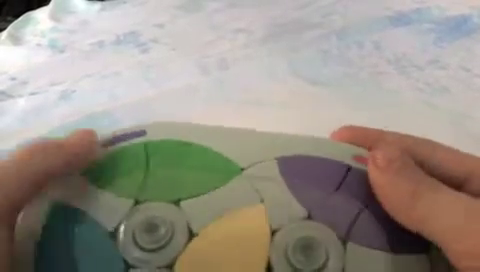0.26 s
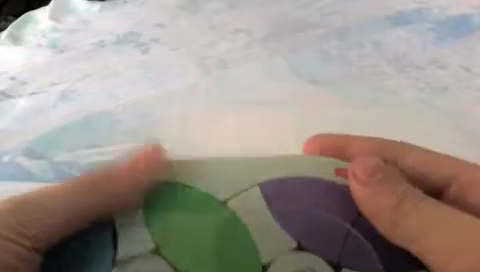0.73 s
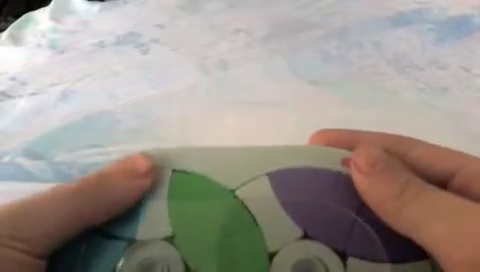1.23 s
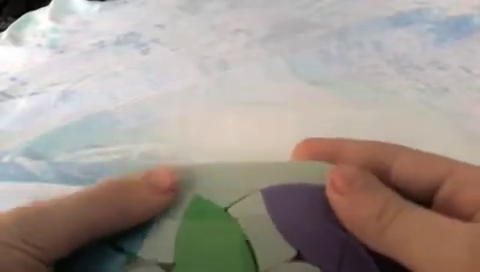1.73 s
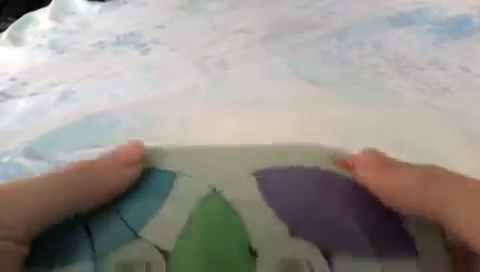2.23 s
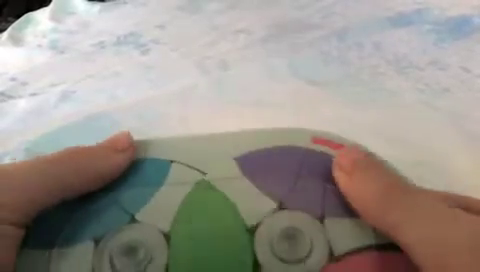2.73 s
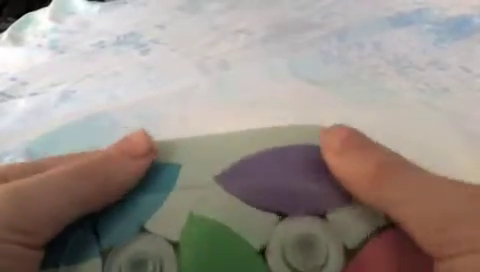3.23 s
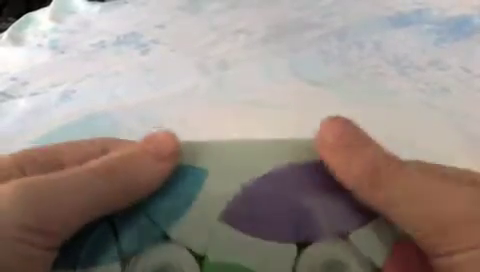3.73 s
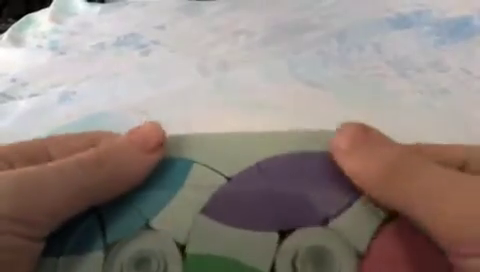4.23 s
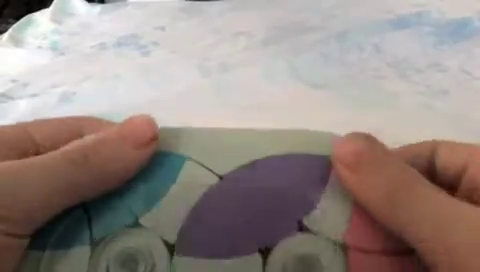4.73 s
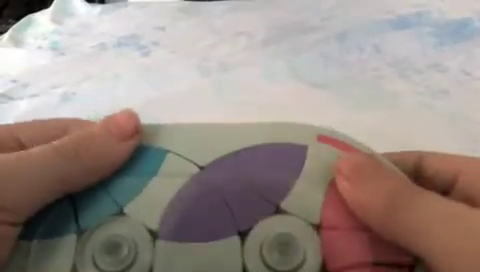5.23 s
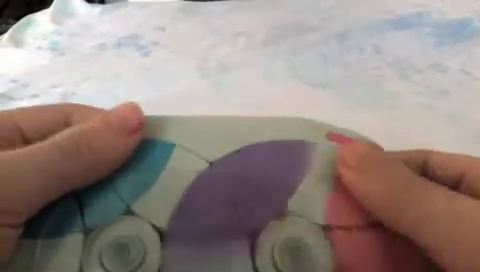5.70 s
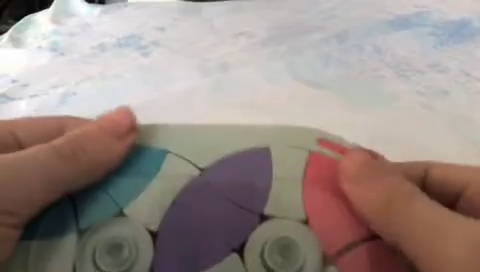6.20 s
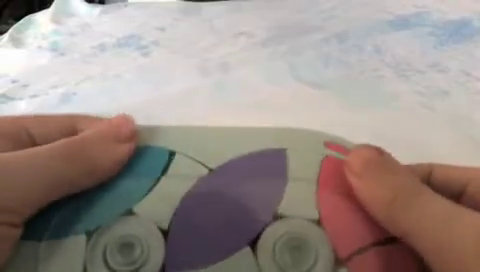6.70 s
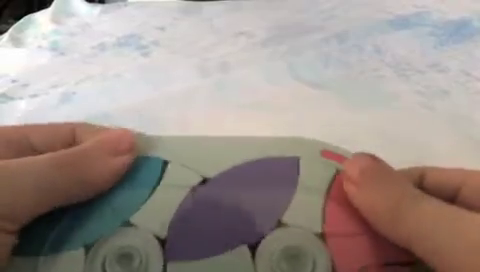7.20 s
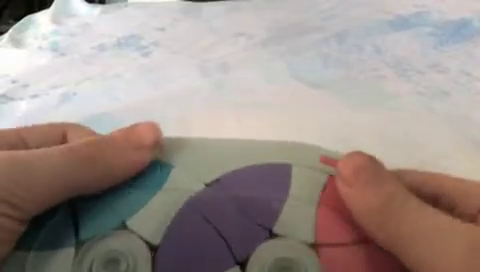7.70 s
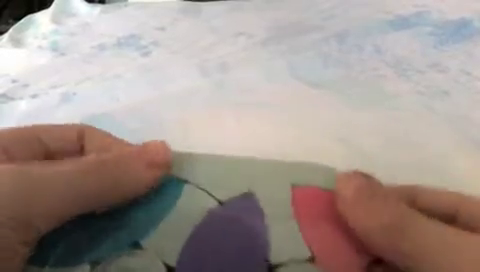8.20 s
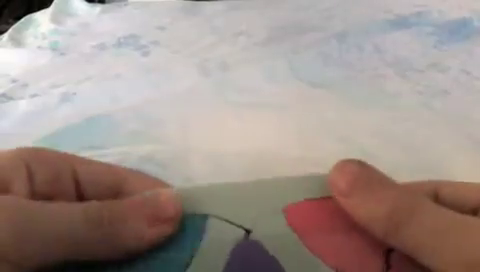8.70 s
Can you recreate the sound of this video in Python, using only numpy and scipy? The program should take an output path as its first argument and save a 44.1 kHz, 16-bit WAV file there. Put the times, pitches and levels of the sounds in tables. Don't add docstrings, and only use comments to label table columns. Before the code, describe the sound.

Hard plastic pieces of a handheld turning puzzle click, clack and scrape in uneven bursts, close up, with a few piercing tiny squeaks in a quiet room.

```python
import sys
import numpy as np
from scipy import signal
from scipy.fft import rfft, irfft, next_fast_len
from scipy.io import wavfile
from scipy.ndimage import uniform_filter1d, map_coordinates

SR = 44100
rng = np.random.default_rng(int(sys.argv[2]) if len(sys.argv) > 2 else 0)


def dump_mix(stems):
    frames = np.atleast_2d(stems).T
    limited = np.clip(frames, -1, 1)
    pcm = np.round(limited * 32767).astype(np.int16)
    wavfile.write(sys.argv[1], SR, pcm)


def nominal_scale(level):
    x = np.asarray(level, float) / 20
    return 10 ** x


N = 394681

# start_s, clack_db
TAPS = [(1.144, -43.5), (5.384, -41), (6.06, -52), (3.156, -32), (4.124, -36), (4.157, -33), (4.247, -40),
        (5.7887, -28), (6.717, -30), (6.789, -27), (6.7945, -38), (7.138, -42), (7.7555, -42), (7.86, -32),
        (8.468, -44), (0.572, -41), (0.726, -40), (.748, -40), (0.79, -38.5), (1.8077, -47), (2.497, -41.5),
        (3.2902, -40), (3.7722, -51), (3.8304, -38), (4.4226, -37), (4.6856, -32), (4.6944, -43),
        (5.0333, -42.5), (8.4988, -41), (1.4822, -42), (7.845, -44), (5.19, -38), (3.3945, -39),
        (4.102, -29.5), (4.009, -39.5), (7.3925, -47), (7.5126, -41.5), (7.915, -35.5), (8.0048, -54),
        (8.067, -32), (8.2676, -31), (8.279, -32), (.5, -34), (.5615, -46), (0.674, -34), (0.7137, -37),
        (.83, -56), (1.837, -41), (1.933, -41), (2.839, -54), (2.917, -36), (4.648, -53), (4.629, -59),
        (8.191, -57), (8.203, -31.5), (8.256, -32), (8.46, -40.5), (8.625, -48.5)]
# centre_s, peak_db, pitch_hz, width_ms
SQUEAKS = [(1.608, -7.5, 12650, 4.9), (1.6202, -22.5, 8580, 10), (1.6685, -9.5, 8980, 7.1),
           (1.6635, -25, 9300, 14), (1.6795, -11.5, 8950, 8.6), (1.6865, -13, 8960, 5.1),
           (1.877, -36.5, 9100, 6.2), (1.893, -38, 9270, 8.1), (1.857, -13.5, 8990, 5.8),
           (1.862, -14, 9160, 3.5), (1.866, -21, 9600, 3.5), (1.846, -35, 8880, 8), (2.95, -23, 9060, 3.7),
           (4.97, -22, 8920, 3.1), (1.105, -29.5, 8970, 4), (4.956, -29, 8800, 2), (6.5444, -4, 9690, 4.9),
           (6.7863, 0.5, 9820, 7.1), (6.8172, -30.5, 9730, 4), (7.0844, -8, 9710, 4.9),
           (7.3137, -4.5, 9890, 4.7), (7.3387, -3, 10050, 5.7)]
# start_s, peak_db, pitch_hz
THUDS = [(0.054, -37.5, 167.4), (1.694, -41.5, 164), (3.634, -44.5, 105), (3.744, -44.5, 169),
         (3.941, -56, 199), (3.962, -56, 148), (4.628, -52.5, 222), (4.666, -50, 162), (3.953, -49, 150),
         (5.498, -45.5, 143), (8.03, -32, 480)]
# start_s, end_s, level_db
BRUSHES = [(2.008, 2.04, -59), (2.25, 2.346, -64), (2.361, 2.384, -46.5), (2.41, 2.518, -56),
           (8.62, 8.637, -53.5), (0.937, 0.953, -55.5), (5.911, 5.93, -65)]
# centre_hz, width_hz, level_db
SHELL = [(544, 280, -8.5), (792, 540, -5), (1069, 470, 3), (1310, 440, -0.2)]
# centre_hz, width_hz, level_db
PIECES = [(2120, 1500, -9.5), (2942, 1470, 3.7), (3950, 1600, 1), (4740, 380, -7.5)]
# centre_hz, width_hz, level_db
EDGES = [(6410, 1200, 4), (8580, 1600, 6.5), (10470, 840, 7.5), (12500, 1700, -1.5), (14500, 1500, -15)]
# pitch_hz, level_db
HUSH = [(30, -36.5), (100, -0.5), (370, -4.5), (480, -11), (900, -1.5), (2070, -13), (2800, -15.5),
        (4500, -21.5), (7000, -26), (10000, -31), (13500, -42.5)]
# pitch_hz, t60_s
WALLS = [(300, 0.51), (1500, 0.24), (10000, 0.18), (13000, 0.14)]
# pitch_hz, level_db
WALL_COLOUR = [(400, -4), (1400, -2), (2000, 1.5), (5500, -2), (8000, 1), (11000, -3.5), (12700, -5)]
# start_s, clack_db, rattle_ms
JOLTS = [(.6368, -37.5, 8.1), (3.1648, -43, 7.5), (4.7103, -38, 8.6), (4.8013, -33, 8.3),
         (7.1428, -43.5, 7.1), (8.239, -32, 8.6)]
# start_s, clack_db, rattle_ms
THUNKS = [(.285, -29.5, 5.3), (.4741, -28, 6.2), (1.0107, -31.5, 3.9), (1.091, -31, 12), (2.0024, -40, 4.5),
          (2.8077, -36, 7), (3.1995, -30.5, 13.4), (3.2212, -31, 2.8), (3.3913, -45, 21),
          (4.0945, -31.5, 5.7), (4.1461, -25.5, 3.4), (5.4786, -27, 2.1), (5.7494, -24, 7.1),
          (6.7209, -24.5, 3.7), (6.824, -25.5, 4.6), (7.053, -27, 4.3), (7.7727, -21.5, 3.9),
          (3.727, -22, 7.2), (8.3036, -31.5, 18.7), (8.508, -33.5, 7.8), (8.5276, -35, 4.5),
          (8.6357, -37, 5.7), (8.7498, -23, 3), (8.7696, -28, 4.3), (8.8703, -39.5, 7.6)]
# start_s, clack_db, rattle_ms
SMACKS = [(.9717, -35.5, 2.5), (1.103, -49, 7.1), (4.1287, -26.5, 2.8), (4.1613, -25, 8.3),
          (4.6638, -23, 2.6), (5.4876, -26.5, 10), (5.6809, -22, 1.3), (5.7678, -20, 5.4),
          (5.7928, -24, 2.3), (6.238, -31, 6.9), (6.266, -28.5, 3.5), (7.3149, -26, 2)]
# start_s, clack_db, rattle_ms
CLACKS = [(.456, -27.5, 4.5), (1.4275, -33.5, 18), (1.4508, -23, 4), (1.5832, -20, 3), (2.1861, -24.5, 5.2),
          (2.2144, -27, 6.5), (2.2955, -32, 5.3), (2.5781, -30, 3.4), (2.628, -31.5, 5.4),
          (2.668, -34.5, 6.4), (7.8675, -16.5, 9.9), (2.9025, -20.5, 7.1), (3.4667, -33.5, 8.8),
          (3.8624, -29.5, 9.4), (4.0172, -19.5, 6.2), (4.2522, -27.5, 3.9), (4.4704, -34.5, 11),
          (4.5202, -34, 4.9), (6.4941, -22, 3.9), (6.593, -28, 1.5), (6.7284, -25, 2.1),
          (2.4423, -29.5, 2.15), (7.289, -28.5, 4), (7.4512, -34, 6.7), (7.5285, -33, 24),
          (7.829, -23.5, 8.7), (8.0243, -23, 14), (8.0572, -23, 1.6), (8.7061, -32.5, 3.7)]
# start_s, clack_db, rattle_ms
CLICKS = [(3.1925, -28, 5), (1.4596, -31, 8.9), (1.5773, -19.5, 4), (1.5955, -15.5, 4), (2.172, -23.5, 3.3),
          (2.235, -28, 9.3), (3.1064, -20.5, 3.6), (3.592, -30.5, 7.9), (3.626, -22.5, 3.6),
          (3.7148, -17.5, 7.3), (4.2877, -35, 5.2), (4.4455, -20, 12), (4.677, -29, 3.5),
          (4.9545, -32, 3.7), (4.9679, -25, 6.4), (5.1685, -32.5, 3), (5.1725, -24.5, 3.8),
          (5.3573, -25.5, 4.3), (5.6728, -27.5, 3.3), (5.9904, -18, 3.1), (6.5017, -23, 3.8),
          (7.2606, -22.5, 2.6), (7.72, -30, 2.4), (7.7285, -24.5, 3.7), (7.8108, -23, 6.6),
          (8.2148, -18.5, 5.1), (8.219, -21, 2.8), (8.2227, -22, 2.9), (8.7118, -26, 5.6),
          (8.7208, -30, 4.5)]
# start_s, clack_db, rattle_ms
TOCKS = [(.275, -17, 3.6), (.418, -38.5, 5.6), (.435, -30.5, 4.8), (.442, -23, 3.2), (1.4415, -25.5, 5.1),
         (1.5072, -32.5, 8.9), (1.9065, -38, 5.8), (1.9534, -36.5, 2.1), (2.0214, -38, 9.2),
         (3.1195, -22.5, 1.5), (3.1249, -20, 1.6), (3.1809, -28, 3.6), (3.3997, -26.5, 3.3),
         (3.8398, -33, 3), (3.8478, -27.5, 5.5), (5.1765, -25.5, 3), (6.6943, -42.5, 1.4),
         (7.5404, -19.5, 4.5), (7.5638, -38, 9.4), (8.0397, -24, 9.7), (8.0762, -35, 5.2),
         (8.7839, -33.5, 5.6)]
# start_s, clack_db, rattle_ms
TICKS = [(.463, -23.5, 1.5), (.9817, -20.5, 2.85), (2.0299, -26.5, 4.3), (2.6122, -27.5, 3.4),
         (2.9418, -26, 13.3), (5.8033, -22.5, 11), (5.7, -30.5, 1.8), (7.036, -27, 9.9),
         (7.0844, -33.5, 4.1), (7.2483, -27, 1.54), (3.0985, -29.5, 3), (7.2945, -37.5, 3),
         (4.812, -33, 3.8), (4.945, -48, 3), (3.7, -38, 4.5)]
# start_s, clack_db, rattle_ms
SLAMS = [
    (2.7122, -16.5, 5),
    (2.7165, -14.5, 10),
]
# knocks, shell_db, tick_db
KINDS = [(SLAMS, -3, -9), (JOLTS, 9.3, -0.64), (THUNKS, 0.52, -13), (SMACKS, 0.36, -0.38),
         (CLACKS, -4.5, -7.5), (CLICKS, -7, -2.6), (TOCKS, -18, -11), (TICKS, -13.5, -1.1)]
# start_s, end_s, start_db, end_db
DRAGS = [(.431, .574, -49.5, -33.5), (1.425, 1.503, -51, -58), (1.585, 1.625, -41.5, -36),
         (1.682, 1.713, -40, -56), (2.175, 2.238, -55, -49), (2.576, 2.64, -49.5, -50),
         (2.897, 2.951, -48.5, -33), (3.091, 3.219, -49.5, -34.5), (3.736, 3.784, -36, -45.5),
         (4.008, 4.059, -47.5, -71.5), (4.092, 4.167, -60, -40.5), (4.7, 4.797, -42, -35),
         (4.852, 4.886, -53, -50.5), (4.944, 4.999, -49, -59), (5.167, 5.213, -37.5, -59),
         (5.768, 5.814, -38.5, -25), (5.972, 5.996, -65, -44), (6.503, 6.594, -37, -50),
         (6.71, 6.844, -39.5, -59), (7.244, 7.348, -45.5, -41), (7.524, 7.6, -59.5, -63),
         (7.716, 7.841, -60.5, -32), (7.849, 7.884, -50.5, -23), (8.017, 8.055, -29, -43.5),
         (8.235, 8.33, -29, -45.5), (8.74, 8.768, -34.5, -37.5), (8.779, 8.81, -29.5, -73)]
# start_s, end_s, start_db, end_db
SLIDES = [(.267, .302, -63, -33), (.575, .667, -48, -38.5), (.666, .76, -39, -45.5),
          (.968, 1.108, -64.5, -30), (1.627, 1.683, -47, -42.5), (1.829, 1.952, -40.5, -47),
          (2.705, 2.747, -50.5, -42.5), (3.085, 3.104, -81, -25.5), (4.425, 4.444, -57, -32.5),
          (4.445, 4.51, -68, -71), (5.468, 5.593, -40.5, -49), (5.674, 5.76, -30, -54.5),
          (5.997, 6.044, -39.5, -67), (6.224, 6.294, -37, -75), (6.478, 6.506, -56.5, -40.5),
          (7.026, 7.162, -36.5, -46.5), (7.882, 7.94, -44, -69), (8.063, 8.096, -46, -63),
          (8.201, 8.235, -46, -41), (8.332, 8.362, -38.5, -64), (8.46, 8.537, -51.5, -49.5),
          (8.703, 8.737, -63, -63)]
# start_s, end_s, start_db, end_db
SKIMS = [(1.56, 1.587, -42.5, -37.5), (2.958, 2.99, -65, -53), (3.717, 3.747, -32.5, -50),
         (4.805, 4.831, -38, -83)]
# strokes, brightness_db
STROKES = [(DRAGS, -5), (SLIDES, 0.96), (SKIMS, 16)]
# start_s, peak_db, pitch_hz
PIPS = [(5.92, -37, 2680), (0.0956, -33.5, 2850), (0.174, -33.5, 2710), (0.859, -30.5, 2870),
        (2.085, -41, 3230), (5.23, -35, 1106), (5.243, -31, 810), (8.168, -29.5, 2860)]
# start_s, peak_db, pitch_hz
SHELL_NOTES = [(0.273, -19, 1160), (0.636, -14, 1490), (1.429, -31.5, 1270), (2.173, -33, 890),
               (2.295, -22.5, 1460), (2.717, -15, 1413), (2.807, -32, 1100), (2.903, -20, 1390),
               (3.108, -10.5, 1260), (3.467, -27, 1340), (3.626, -13.5, 1407), (3.715, -3.5, 1240),
               (4.018, -24, 1320), (4.13, -10, 1070), (4.664, -17, 1110), (4.799, -5, 985),
               (5.356, -25.5, 1520), (5.749, -11.5, 1120), (5.993, -21, 1535), (6.238, -15, 1065),
               (6.264, -14.5, 1320), (6.718, -17, 1175), (6.823, -12.5, 1030), (7.725, -12, 1104),
               (7.772, -26, 1140), (7.869, -3, 1290), (8.02, -20, 1030), (8.217, -9, 1380),
               (8.712, -18, 751)]
# start_s, peak_db, pitch_hz
PIECE_NOTES = [(0.2728, -15.5, 3950), (0.4174, -26, 3170), (1.01, -27, 3090), (1.4267, -32, 3980),
               (1.5055, -20.5, 3320), (1.5703, -21.5, 3430), (2.0293, -21.5, 4500), (2.1715, -16, 3820),
               (2.2149, -17.5, 2880), (2.2952, -23.5, 4890), (2.4409, -25, 2756), (2.5785, -18.5, 3440),
               (2.7127, -3, 3720), (2.9033, -10.5, 3030), (3.0954, -28, 3510), (3.1058, -11, 3340),
               (3.4, -19, 2780), (3.4665, -27, 4140), (3.6257, -20, 4940), (4.0168, -12.5, 4440),
               (4.0173, -16, 3280), (4.0951, -20, 3040), (4.2517, -13.5, 3180), (4.4233, -27, 3950),
               (4.6638, -16.5, 4440), (4.9555, -16.5, 4640), (5.1725, -17, 3900), (5.3558, -20, 3950),
               (5.4765, -14, 3670), (5.6715, -21, 4790), (5.9756, -30.5, 3150), (5.9928, -15, 3090),
               (6.4961, -16.5, 4650), (6.6917, -30, 3110), (6.7193, -18, 2750), (7.0364, -13, 4440),
               (7.232, -44, 2950), (7.2469, -15.5, 3880), (7.5298, -12, 4080), (7.7199, -15, 3610),
               (7.8111, -16, 3420), (7.8681, -3, 4160), (8.023, -7, 3210), (8.2087, -13, 2740),
               (8.7101, -18.5, 3920)]
# start_s, peak_db, pitch_hz
RIM_NOTES = [(0.2728, -13.5, 7180), (0.9712, -27, 7450), (0.981, -8, 6550), (1.431, -18, 5025),
             (1.5638, -27, 6690), (2.0293, -22, 7240), (2.172, -26, 6770), (2.7117, -4, 6410),
             (2.9033, -21.5, 6580), (3.1053, -25, 6900), (3.3972, -28.5, 7680), (3.467, -26, 7030),
             (3.5962, -26, 6230), (3.6247, -25, 5630), (3.717, -13, 7480), (4.0184, -12.5, 5470),
             (4.129, -24, 7930), (4.161, -18, 7550), (4.2522, -26, 6010), (4.6638, -11, 6850),
             (4.9541, -20, 6370), (5.1726, -15, 6230), (5.3577, -21, 7080), (5.4727, -18, 7920),
             (5.6715, -14, 6240), (5.9908, -9, 8120), (6.4976, -13, 8140), (7.0354, -16, 6520),
             (7.2469, -21.5, 6500), (7.531, -13.5, 5280), (7.7188, -22.5, 5200), (7.864, -21, 6630),
             (8.0233, -13, 8060), (8.2087, -15, 8200), (8.7116, -13.5, 7840)]
# notes, share_db, t60_s
NOTES = [(SHELL_NOTES, -6, 0.019), (PIECE_NOTES, -0.15, .016), (RIM_NOTES, -2.5, 0.012)]


def unit(x):
    return x / np.sqrt(np.mean(x ** 2) + 1e-20)


def along(points, hz):
    f, v = np.transpose(points)
    return np.interp(np.log(hz + 1), np.log(f + 1), v)


def filtered(x, response):
    m = next_fast_len(N + SR // 2)
    return irfft(rfft(x, m) * response(np.fft.rfftfreq(m, 1 / SR)), m)[..., :N]


def bass_cut(hz, corner_hz):
    return (hz / (hz - 1j * corner_hz)) ** 2


def body(modes, f, shift=1, db_scatter=0):
    shift, db_scatter = np.broadcast_arrays(shift, db_scatter, np.zeros(len(modes)))[:2]
    z = 0
    for k, (centre, width, db) in enumerate(modes):
        c = centre * shift[..., k, None]
        resonance = (1j * f * width / (c * c - f * f + 1j * f * width)) ** 1.827
        z = z + nominal_scale(db + db_scatter[..., k, None]) * resonance
    return z / np.sqrt(np.mean(np.abs(z) ** 2, -1, keepdims=True))


def ring(x, modes):
    return filtered(x, lambda f: body(modes, f))


def lay(starts, rows):
    at = np.round(np.asarray(starts) * SR).astype(int)[:, None] + np.arange(rows.shape[1])
    return np.bincount(at.ravel(), rows.ravel(), N + SR)[:N]


def grit(shape, spread_db):
    return unit(rng.standard_normal(shape) * nominal_scale(spread_db * rng.standard_normal(shape)))


def wander(shape, size, passes=1):
    x = rng.standard_normal(shape)
    for _ in range(passes):
        x = uniform_filter1d(x, size=size, axis=-1)
    return unit(x)


def stroke(start, end, db0, db1, edge):
    t = np.arange(N) / SR
    gate = np.interp(t, [start - edge, start + edge, end - edge, end + edge], [0, 1, 1, 0])
    return nominal_scale(np.interp(t, [start, end], [db0, db1])) * gate


def hush():
    return nominal_scale(-66.5) * unit(filtered(rng.standard_normal(N), lambda hz: nominal_scale(along(HUSH, hz))))


def thuds():
    s, db, hz = np.transpose(THUDS)[:, :, None]
    t = np.arange(SR // 8) / SR
    deep = hz < 300
    flutter = wander((len(s), len(t)), 160)
    bend = 0.00084 * np.exp(-t / 0.0096) * deep
    damping = np.exp(-(t / np.where(deep, .014, .02)) ** 1.7)
    low = np.sin(2 * np.pi * hz * (t - bend)) * damping * nominal_scale(4.1 * flutter * deep)
    push = .9 * np.sin(2 * np.pi * 2.4 * hz * t) * nominal_scale(-60 * t / .06 + 1.5 * flutter) * deep
    rub = 0.13 * (flutter - np.roll(flutter, shift=90, axis=1)) * np.exp(-t / 0.011) * deep
    onset = 1 - np.exp(-(t / 0.0025) ** 2)
    return lay(s[:, 0], nominal_scale(db) * (low + push + rub) * onset)


def room(x):
    step, out = SR // 8, np.zeros(N + SR)
    for k in range(0, N, step):
        hz, t, z = signal.stft(rng.standard_normal(SR // 3), SR, nperseg=256)
        tail = signal.istft(z * nominal_scale(-60 * t / along(WALLS, hz)[:, None]), SR, nperseg=256)[1]
        wet = signal.fftconvolve(x[k:k + step], tail / np.linalg.norm(tail))
        out[k + 300:][:len(wet)] += wet
    return filtered(out[:N], lambda hz: nominal_scale(along(WALL_COLOUR, hz)))


def pips():
    s, db, hz = np.transpose(PIPS)[:, :, None]
    t = np.arange(SR // 20) / SR
    note = np.sin(2 * np.pi * hz * t) * nominal_scale(-60 * t / 0.011) * (1 - np.exp(-t / 0.0016))
    dull = signal.lfilter(*signal.butter(4, .17), rng.standard_normal(note.shape))
    speck = .5 * dull * nominal_scale(-60 * t / 0.015) * (1 - np.exp(-t / 0.00037))
    return lay(s[:, 0], nominal_scale(db) * (note + speck))


def scrapes():
    rows = [(*row, bright_db) for kind, bright_db in STROKES for row in kind]
    press = []
    for start, end, db0, db1, _ in rows:
        edge = 0.0079 * nominal_scale((-57.0 - max(db0, db1)) / 3)
        press.append(stroke(start, end, db0, db1, edge))
    press = np.array(press)
    tilt = nominal_scale(np.array(rows)[:, 4] / 2)

    def slow(rate_hz):
        return map_coordinates(rng.standard_normal(N // 128), [np.arange(N) * rate_hz / SR], mode="mirror")

    shared_db = 1.8 * slow(400)
    specks = grit(N, spread_db=7.5)
    layers = [(SHELL, nominal_scale(-7.5) / tilt, 1.3),
              (PIECES, nominal_scale(-8.0) * np.ones_like(tilt), 1.3),
              (EDGES, nominal_scale(-8.5) * tilt, 1.2)]
    rub = 0
    for modes, gain, own_db in layers:
        clumps = unit(nominal_scale(shared_db + own_db * slow(60)))
        contacts = grit(N, spread_db=2.5) + 1.1 * specks
        rub = rub + ring(gain @ press * clumps * contacts, modes)
    z = signal.stft(rub, nperseg=256)[2]
    patches = uniform_filter1d(rng.standard_normal(z.shape), size=4, axis=0)
    patches = uniform_filter1d(patches, size=9, axis=1)
    return signal.istft(z * unit(nominal_scale(2.1 * unit(patches))), nperseg=256)[1][:N]


def notes():
    out, t = 0, np.arange(SR // 30) / SR
    for rows, share_db, t60 in NOTES:
        s, db, hz = np.transpose(rows)[:, :, None]
        tone = np.sin(2 * np.pi * hz * t + .8 * wander((len(s), len(t)), 60))
        onset = 1 - np.exp(-(t / 0.001) ** 2)
        out = out + lay(s[:, 0], nominal_scale(db + share_db - 60 * t / t60) * onset * tone)
    return out


def knocks():
    rows = [(s, db, shell, tick, ms) for kind, shell, tick in KINDS for s, db, ms in kind]
    rows += [(s, db, -6, .7 * db + 17.0, 3.5) for s, db in TAPS]
    s, db, shell_db, tick_db, ms = np.transpose(rows)[:, :, None]
    t = np.arange(4096) / SR
    f = np.fft.rfftfreq(len(t), 1 / SR)
    out, lead = 0, .004
    soft = 1 / (1 + 1j * f / (19000 * nominal_scale((db + 14.0) / 3.4))) ** 3
    contacts = grit((len(s), len(t)), spread_db=5.5)
    edge_db = tick_db + 7.0 + 0.23 * (db + 22)
    # resonances, level_db, linger
    parts = [(SHELL, shell_db + 2.5, 1.1), (PIECES, 2.5, .95), (EDGES, edge_db, .55)]
    for modes, rel_db, linger in parts:
        life = np.maximum(ms, .5) * linger / 1000
        after = np.maximum(t - lead, 0)
        onset = 1 - np.exp(-(after / np.minimum(0.16 * life, .0006)) ** 2)
        blow = nominal_scale(-13 * (after / life) ** 1.007) * onset
        blow = blow * (1 + 0.7 * np.exp(-after / 0.00051))
        fade = blow + nominal_scale(-29.0) * (t / lead) ** 2 * (t < lead)
        push = rfft(contacts * fade)
        push = push / uniform_filter1d(np.abs(push) ** 2, size=70, axis=1) ** .4
        spot = rng.standard_normal((2, len(s), len(modes)))
        colour = body(modes, f, 1 + .05 * spot[0], db_scatter=2.2 * spot[1])
        sound = irfft(push * soft * colour, len(t))
        sound *= np.sqrt(np.sum(fade ** 2, 1) / np.sum(sound ** 2, 1))[:, None]
        out = out + lay(s[:, 0] - lead - .0002, sound * nominal_scale(db + rel_db))
    return out


def brushes():
    press = sum(stroke(start, end, db, db, edge=0.014) for start, end, db in BRUSHES)
    hiss = press * nominal_scale(2 * wander(N, 500)) * grit(N, spread_db=5.5)
    return ring(hiss, [(3180, 2000, -3.5), (9880, 1200, 6.5)])


def squeaks():
    s, db, hz, ms = np.transpose(SQUEAKS)[:, :, None]
    half = .025
    t = np.arange(round(2 * half * SR)) / SR - half
    shape = (len(s), len(t))
    swell = np.exp(-.7 * np.abs(2000 * t / ms) ** 2.4) + 0.025 * np.exp(-np.abs(t) / 0.0091)
    phase = 2 * np.pi * hz * t + 0.17 * wander(shape, 40, passes=3)
    grip_db = -db / 9 * wander(shape, 60, passes=2)
    return lay(s[:, 0] - half, nominal_scale(db + grip_db) * swell * np.sin(phase))


def scene():
    def small(x):
        return filtered(x, lambda hz: bass_cut(hz, 337))

    own = small(notes())
    near = small(knocks()) + scrapes() + squeaks() + pips() + thuds() + brushes()
    echo = nominal_scale(-18.0) * room(near + nominal_scale(-9.5) * own)
    return (near + own + echo + hush())[None]


def top_cut(x):
    return signal.sosfilt(signal.butter(12, 16460, fs=SR, output="sos"), x)


def record(dry):
    clipped = dry / (1 + np.abs(dry / .88) ** 9) ** (1 / 9)
    mix = filtered(clipped, lambda hz: bass_cut(hz, 66.6) / (1 + (hz / 15330) ** 60))
    return top_cut(mix)


dry = scene()
out = record(dry)
dump_mix(out)
```